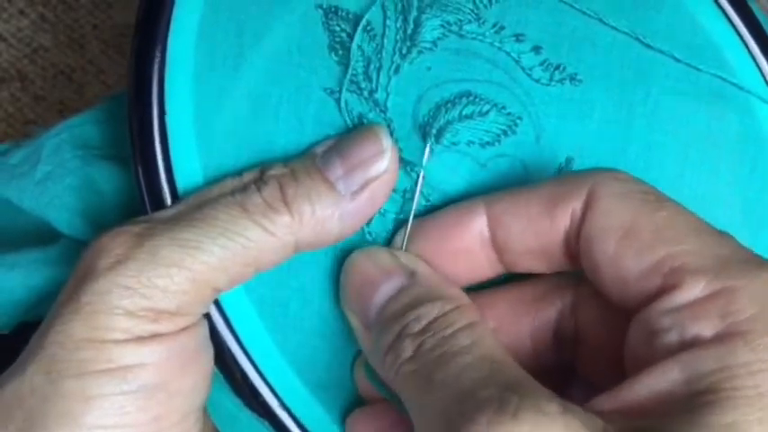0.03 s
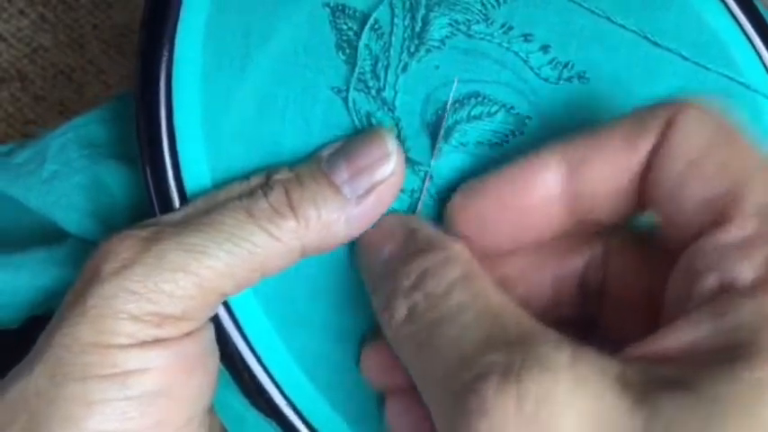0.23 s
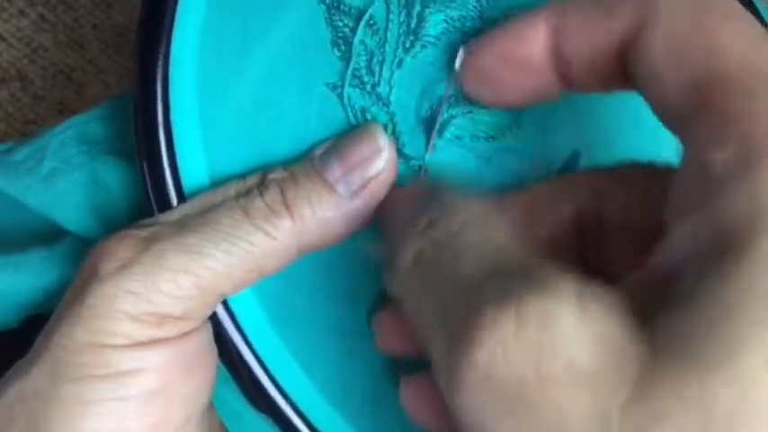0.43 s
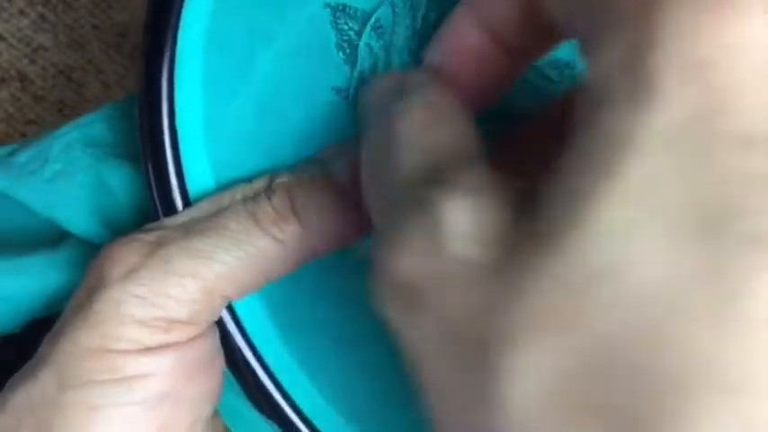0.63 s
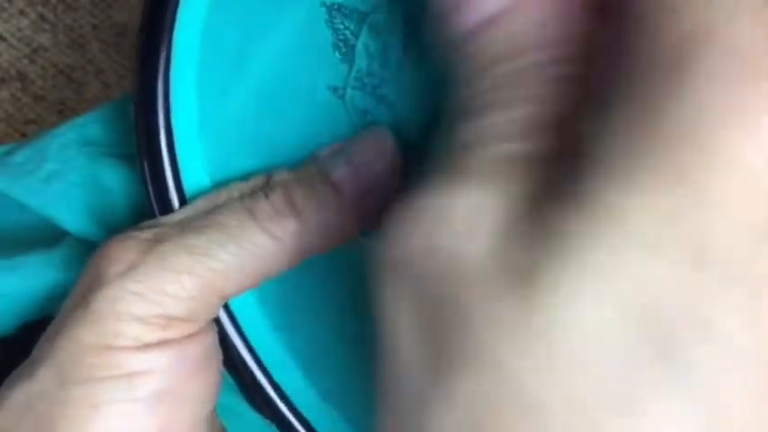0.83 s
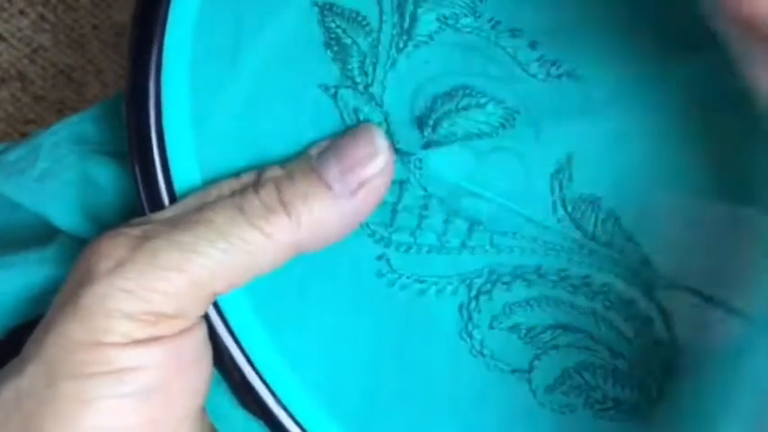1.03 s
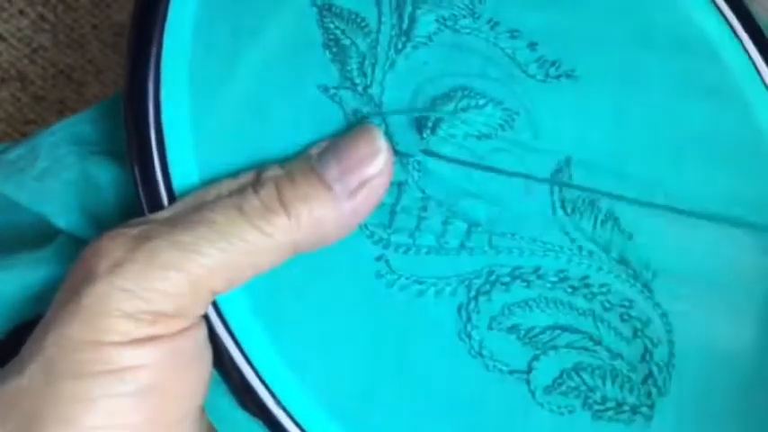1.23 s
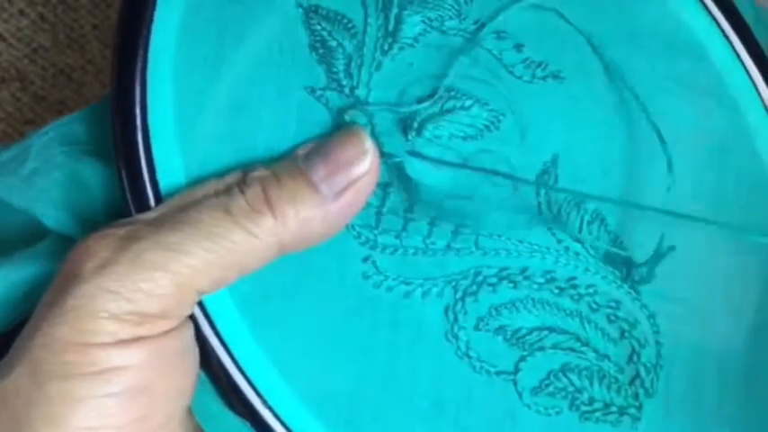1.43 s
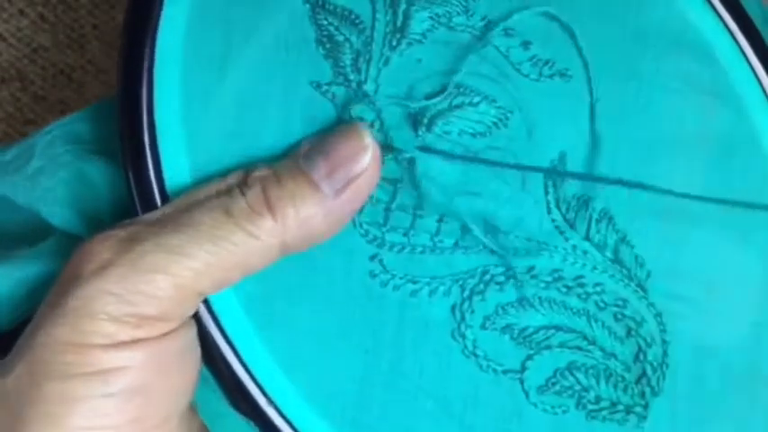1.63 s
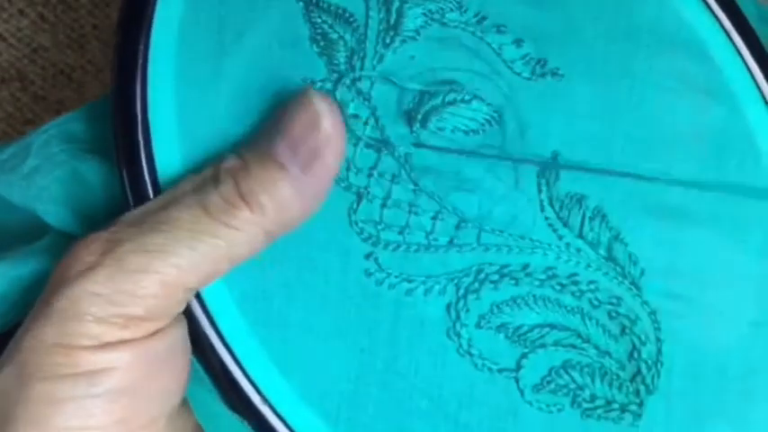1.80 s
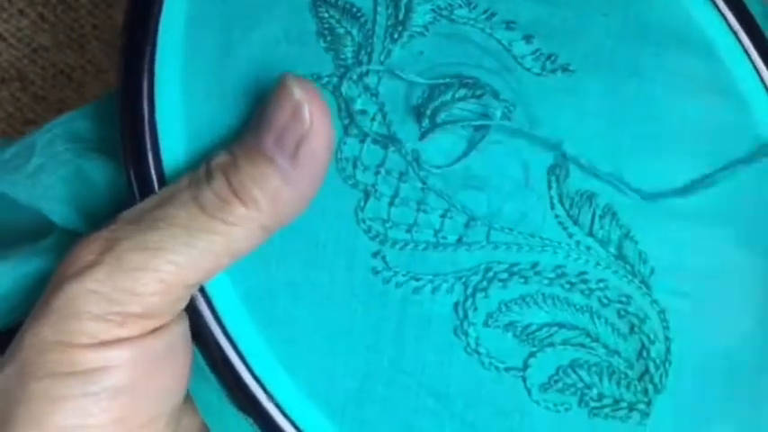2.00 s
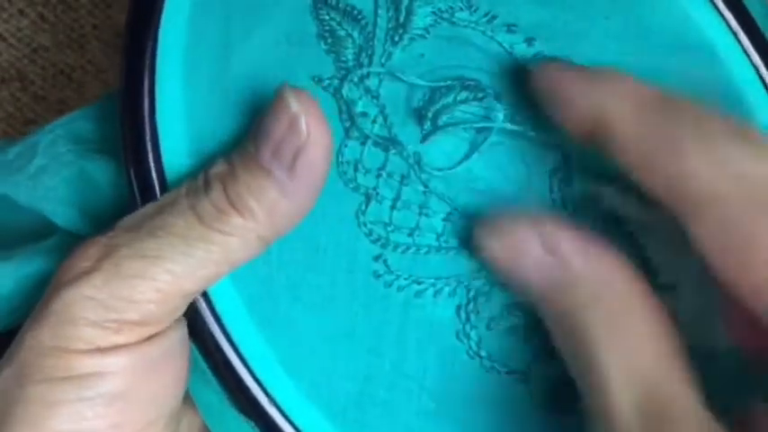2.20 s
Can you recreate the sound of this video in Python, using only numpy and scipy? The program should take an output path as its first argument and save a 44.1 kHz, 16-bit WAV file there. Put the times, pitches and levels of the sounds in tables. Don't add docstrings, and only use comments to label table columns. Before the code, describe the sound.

Close up in a quiet room, fibres hiss softly under fingers and needle, stretched fabric taps like a small drum, thread rasps through it, and another thump follows before it settles to faint hiss.

```python
import sys
import numpy as np
from scipy import signal
from scipy.fft import rfft, irfft
from scipy.io import wavfile
from scipy.ndimage import uniform_filter1d

SR = 44100
rng = np.random.default_rng(int(sys.argv[2]) if len(sys.argv) > 2 else 0)


def transcribe(u):
    v = np.clip(np.atleast_2d(u).T, -1, 1)
    q = np.round(v * 32767).astype(np.int16)
    wavfile.write(sys.argv[1], SR, q)


def attenuation_scalar(level_db):
    decades = np.asarray(level_db, float) / 20
    return 10 ** decades


N = 99577

TOP_HZ = 15800
SNAP_RISE_S, SAG_PER_S = 0.00011, 22


def bump(hz, centre_hz, octaves):
    return np.exp(-.5 * (np.log2((hz + 1) / centre_hz) / octaves) ** 2)


def even(x):
    return x / np.sqrt(np.mean(x ** 2) + 1e-30)


def smooth(x, bins, frames):
    return uniform_filter1d(uniform_filter1d(x, size=bins, axis=0), size=frames, axis=1)


def spectra(x):
    hz, t, values = signal.stft(x, SR, nperseg=512, noverlap=384)
    return hz[:, None], t, values


def colour(x, gain):
    return signal.istft(spectra(x)[2] * gain, nperseg=512, noverlap=384)[1][:N]


def struck(rows, rise_s, sag_per_s):
    out = np.zeros(N)
    for s, db, hz, t60 in rows:
        t = np.clip(np.arange(N) / SR - s, 0, 3 * t60)
        turns = hz * np.log1p(sag_per_s * t) / sag_per_s
        ring = attenuation_scalar(db - 60 * t / t60) * np.sin(2 * np.pi * turns)
        out += ring * (1 - np.exp(-t / rise_s)) ** 2
    return out


def swells(rows):
    t = np.arange(N) / SR
    out = np.zeros(N)
    for s, db, hz, size in rows:
        out += attenuation_scalar(db) * np.exp(-((t - s) / size) ** 2) * np.cos(2 * np.pi * hz * (t - s))
    return out


def stroke_power(rows, octaves, bed_db, hz, t):
    power = 0
    for peak, rise, fall, db, bright_hz in rows:
        away = np.where(t < peak, (peak - t) / rise, (t - peak) / fall)
        shape = (bump(hz, bright_hz, octaves) + attenuation_scalar(bed_db) * bump(hz, bright_hz, 3.7)) ** 2
        power = power + shape / shape.mean() * attenuation_scalar(db - 20 * away) ** 2
    return power


def air():
    # (frequency [Hz], density [dB per Hz])
    room_tone = [
        (25, -31),
        (60, 3.5),
        (130, -5),
        (280, -6),
        (520, -17.5),
        (1200, -23),
        (5000, -31),
        (12800, -33),
    ]
    hz = np.fft.rfftfreq(N, 1 / SR)
    tone_hz, tone_db = np.transpose(room_tone)
    gain = attenuation_scalar(np.interp(np.log(hz + 1), np.log(tone_hz), tone_db, left=-60))
    gain = gain / (1 + (hz / 14300) ** 20)
    return attenuation_scalar(-53.5) * even(irfft(rfft(rng.standard_normal(N)) * gain, N))


def grumbles(hz, t):
    # (peak [s], rise [s], fall [s], level [dB], brightest [Hz])
    finger_shifts = [
        (.19, 0.06, 0.058, -47.5, 193),
        (.53, 0.058, 0.027, -56, 332),
        (1.06, 0.14, 0.036, -50.5, 360),
        (1.26, 0.11, 0.051, -52, 284),
        (1.52, 0.091, 0.14, -50.5, 134),
        (1.74, 0.066, 0.14, -47.5, 350),
        (1.815, 0.016, 0.026, -47, 1240),
        (.9, 0.03, 0.034, -42.5, 337),
        (1.9, 0.054, 0.014, -61, 130),
        (2.17, 0.076, 0.27, -63, 267),
    ]
    return stroke_power(finger_shifts, 0.52, -20.5, hz, t)


def whines(hz, t):
    # (peak [s], rise [s], fall [s], level [dB], brightest [Hz])
    thread_whines = [(1.288, 0.027, 0.045, -50, 2700), (1.343, .04, 0.064, -59, 2670),
                     (1.32, .04, 0.041, -60.5, 3220), (1.255, .03, 0.035, -58, 4000),
                     (1.77, .04, .06, -59.5, 4730), (1.77, .03, 0.056, -60, 770),
                     (1.755, 0.067, 0.15, -51, 11260), (0.516, 0.055, 0.16, -54, 4900),
                     (1.564, 0.1, 0.14, -64, 2170), (1.07, .12, 0.21, -54.5, 6260),
                     (1.18, 0.2, 0.059, -54, 1330)]
    return stroke_power(thread_whines, 0.097, -37, hz, t)


def squeals(hz, t):
    # (peak [s], rise [s], fall [s], level [dB], brightest [Hz])
    tight_squeals = [
        (1.76, .04, .11, -52, 3120),
        (1.855, .05, .02, -60, 3100),
        (1.881, .015, .025, -65, 3080),
        (1.712, .01, .05, -59, 3700),
    ]
    return stroke_power(tight_squeals, .04, -37, hz, t)


def throbs():
    # (crest [s], peak [dB], frequency [Hz], length [s])
    skin_throbs = [(0.05, -42.5, 364, 0.005), (.176, -45.5, 217, 0.012), (.205, -43, 159, 0.0095),
                   (.441, -37.5, 181, 0.013), (.512, -40.5, 158, 0.0081), (.515, -45, 320, 0.0092),
                   (.542, -40.5, 167, 0.006), (.655, -48, 148, 0.028), (.719, -35, 75, 0.0092),
                   (0.756, -38, 89, 0.013), (1.27, -40, 327, 0.016), (0.883, -32.5, 114, 0.01),
                   (.905, -24, 96, 0.015), (0.942, -29, 79.6, 0.0093), (0.967, -49, 85, .012),
                   (1.093, -34.5, 95, 0.014), (1.153, -33.5, 202, 0.0046), (1.21, -34.5, 127, 0.027),
                   (1.243, -32, 199, 0.003), (1.274, -36, 220, 0.005), (1.293, -31.5, 99, 0.02),
                   (1.318, -32.5, 120, 0.0098), (1.365, -41.5, 134, 0.0083), (1.465, -43.5, 155, 0.012),
                   (1.578, -37, 102, 0.0081), (1.765, -40.5, 147, 0.028), (1.799, -30, 130, 0.0055),
                   (1.832, -29, 60, 0.022), (1.8112, -24, 160, .0035), (1.835, -27, 120, .004),
                   (.895, -28, 250, .003), (1.852, -31, 154, 0.012), (1.91, -43, 75, 0.01),
                   (1.135, -43, 85, .015), (1.42, -52, 70, .015), (1.48, -49, 65, .015),
                   (1.525, -45.5, 75, .012), (1.62, -51, 80, .012), (1.95, -48.5, 151, 0.0079),
                   (2.11, -55, 55, 0.018), (1.52, -54.5, 380, 0.025)]
    return swells(skin_throbs)


def taps():
    # (time [s], peak [dB], frequency [Hz], t60 [s])
    skin_taps = [
        (.8894, -11.5, 214, 0.024),
        (.8897, -24.5, 313, 0.056),
        (1.8042, -8, 184, 0.035),
        (1.8045, -20, 292, 0.014),
        (1.8045, -26.5, 604, 0.028),
        (1.826, -19, 157, 0.04),
        (1.827, -38, 313, 0.027),
    ]
    return struck(skin_taps, 0.00065, SAG_PER_S)


def crackles():
    # (time [s], level [dB], t60 [s])
    fibre_bursts = [
        (.399, -55, .006),
        (0.6728, -42, 0.004),
        (0.6941, -41.5, 0.0098),
        (.889, -39, 0.0066),
        (.8925, -59, 0.006),
        (1.356, -52, 0.0091),
        (1.8036, -44, 0.008),
        (1.963, -53, .008),
    ]
    t = np.arange(N) / SR
    envelope = sum(attenuation_scalar(db - 60 * np.abs(t - s) / t60) * (t >= s) for s, db, t60 in fibre_bursts)
    bursts = rng.standard_normal(N) * envelope
    return signal.lfilter(*signal.butter(2, 2500, "high", fs=SR), bursts)


def snaps():
    # (crest [s], peak [dB], frequency [Hz], length [s])
    nail_snaps = [(.69292, -25, 1910, 0.00034), (.6965, -41, 1800, 0.00038), (.702, -42, 1950, 0.001),
                  (.88955, -18, 1450, 0.00027), (.8897, -34, 2750, .0005), (.8935, -46, 2500, 0.0007),
                  (.8965, -46, 3300, .0006), (.6928, -42, 4070, 0.00042), (1.8040, -35, 4860, 0.00073),
                  (1.8040, -35.5, 2780, 0.00054), (1.8195, -41.5, 1310, .0018), (1.816, -47, 2650, .002),
                  (1.8042, -41, 2400, .001), (1.8165, -45, 850, .002), (1.828, -44, 620, .002),
                  (.6942, -39, 1150, .001)]
    return swells(nail_snaps)


def rim():
    # (frequency [Hz], level [dB], t60 [s])
    rim_modes = [
        (657, -5, 0.021),
        (900, -8, .015),
        (1330, -1, .013),
        (1807, -4, .017),
        (2500, -7.5, 0.019),
        (2790, -9, .016),
        (3200, -12, .012),
    ]
    # (time [s], level [dB], brightest [Hz])
    rim_hits = [
        (.6927, -40, 2000),
        (.8894, -26, 1200),
        (1.8038, -36, 800),
    ]
    rows = []
    for s, db, bright_hz in rim_hits:
        for hz, mode_db, t60 in rim_modes:
            loss_db = 6 * (np.log2(hz / bright_hz) / 0.84) ** 2
            rows.append((s, db + mode_db - loss_db, hz, t60))
    return struck(rows, SNAP_RISE_S, 1)


def ticks():
    # (time [s], peak [dB], frequency [Hz], t60 [s])
    needle_ticks = [
        (.8893, -33, 6400, .004),
        (.8893, -35, 4900, .004),
        (1.8035, -38, 11000, .004),
        (1.8035, -42, 8000, .004),
    ]
    return struck(needle_ticks, SNAP_RISE_S, SAG_PER_S)


def scrapes(hz, t):
    # (peak [s], rise [s], fall [s], level [dB], brightest [Hz])
    weave_scrapes = [(.17, 0.36, 0.36, -65.5, 1640), (.30, 0.21, 0.1, -57, 1350),
                     (.435, .04, 0.05, -61, 1800), (.5, .06, .06, -60, 2400),
                     (.505, 0.095, 0.054, -54.5, 1750), (.63, 0.093, 0.045, -62, 1600),
                     (.74, 0.15, 0.018, -59, 1330), (.945, .04, .06, -57, 3000),
                     (1.08, .08, .04, -55, 1050), (1.27, 0.15, 0.033, -48.5, 3400),
                     (1.52, 0.059, 0.16, -77, 1100), (1.53, 0.055, 0.15, -65, 5200),
                     (1.775, 0.082, 0.066, -50, 1350), (1.87, .05, .07, -60, 1140),
                     (.49, 0.11, 0.083, -57, 1000), (1.72, 0.014, 0.027, -54, 1970)]
    return stroke_power(weave_scrapes, 0.3, -14.5, hz, t)


def brushes(hz, t):
    # (peak [s], rise [s], fall [s], level [dB], brightest [Hz])
    fibre_brushes = [(.165, 0.1, 0.12, -42.5, 10000), (.85, 0.12, 0.067, -62, 11000),
                     (.30, 0.09, 0.13, -47.5, 10500), (.35, 0.025, 0.037, -51.5, 12500),
                     (.44, 0.051, 0.034, -51.5, 11000), (.52, 0.092, 0.11, -47.5, 5600),
                     (.70, 0.21, 0.19, -54, 11600), (.765, 0.049, 0.061, -58.5, 12000),
                     (1.278, 0.032, 0.022, -41.5, 10900), (1.36, 0.011, 0.011, -56, 10200),
                     (1.535, 0.26, 0.19, -56.5, 12000), (1.715, 0.0097, 0.079, -51.5, 11400),
                     (1.78, 0.043, 0.11, -49, 10900), (1.865, 0.08, 0.018, -56.5, 11000)]
    return stroke_power(fibre_brushes, 0.3, 0, hz, t)


def thread(hz, t):
    # (time [s], level [dB])
    thread_pull = [(.87, -53.5), (.9, -58.5), (.93, -54), (.96, -52), (1.0, -51), (1.06, -49.5),
                   (1.13, -49), (1.2, -50.5), (1.275, -49.5), (1.295, -58), (1.38, -65)]
    # (frequency [Hz], width [octaves], level [dB])
    weave_modes = [
        (626, .4, 4.5),
        (1350, 0.37, 8),
        (2420, 0.19, 5.5),
        (4800, 0.2, 0.5),
        (6500, 0.21, 0),
        (12000, 0.52, 1),
    ]
    pull = attenuation_scalar(np.interp(t, *np.transpose(thread_pull), left=-120, right=-120)) ** 2
    weave = attenuation_scalar(-3) ** 2 * bump(hz, 4000, 4.1)
    for mode_hz, octaves, db in weave_modes:
        weave = weave + (attenuation_scalar(db) * bump(hz, mode_hz, octaves)) ** 2
    drum = attenuation_scalar(27) ** 2 * bump(hz, 116, 0.66) ** 2
    return weave / weave.mean() * pull * attenuation_scalar(3.5) ** 2 + drum * pull


def fibres():
    slips_per_s, spread_db, patch_db, flicker_db = 9000, 2, .75 * 3, 1.04
    hz, t, _ = spectra(np.zeros(N))
    strength = attenuation_scalar(spread_db * np.minimum(rng.exponential(1, N), 4))
    slips = strength * (rng.random(N) < slips_per_s / SR) * rng.standard_normal(N)
    power = thread(hz, t) + brushes(hz, t) + scrapes(hz, t)
    power = power + grumbles(hz, t) + whines(hz, t) + squeals(hz, t)
    patches = even(smooth(rng.standard_normal((len(t), len(hz))).T, 5, 16))
    flicker = even(uniform_filter1d(rng.standard_normal(len(t)), size=3))
    drift = attenuation_scalar(patch_db * patches + flicker_db * flicker)
    return colour(even(slips + rng.standard_normal(N)), np.sqrt(power) * drift)


def scene():
    skin = throbs() + taps()
    hard = snaps() + rim() + ticks()
    return (air() + skin + crackles() + hard + fibres())[None]


def mute_top(x):
    low_hz, muted_percent, ragged_db = 13500, 24, 1.5
    hz, _, values = spectra(x)
    power = smooth(np.abs(values) ** 2, 3, 9)
    ragged = even(smooth(rng.standard_normal(power.shape[::-1]).T, 4, 16))
    power = power * attenuation_scalar(2 * ragged_db * ragged)
    top = (hz > low_hz) & (hz < TOP_HZ)
    faint = power < np.percentile(power[top[:, 0]], muted_percent)
    return colour(x, 1. - top * faint)


def band_limit(x):
    return signal.sosfilt(signal.butter(12, 15820, fs=SR, output="sos"), x)


def record(dry):
    hz = np.fft.rfftfreq(N, 1 / SR)
    narrow_dip = attenuation_scalar(-9 * bump(hz, 14400, .012))
    bass_cut = 1 / np.sqrt(1 + (44.4 / (hz + 1)) ** 8)
    heard = irfft(rfft(dry[0]) * narrow_dip * bass_cut * (hz < TOP_HZ), N)
    return band_limit(mute_top(heard)[None])


dry = scene()
out = record(dry)
transcribe(out)
```